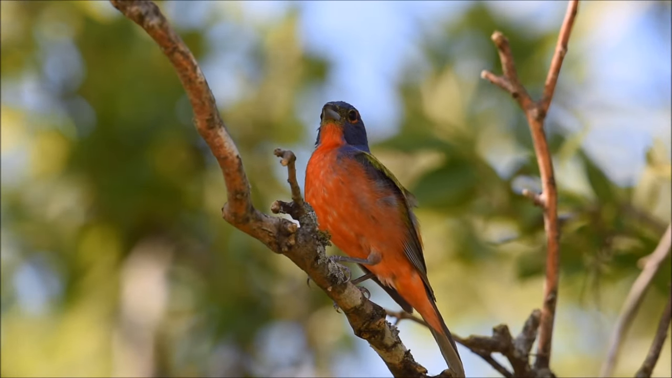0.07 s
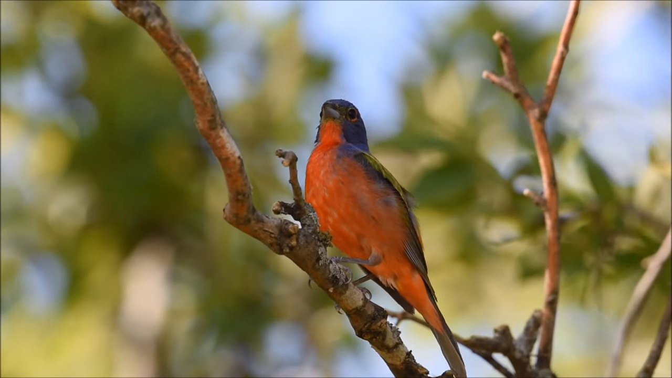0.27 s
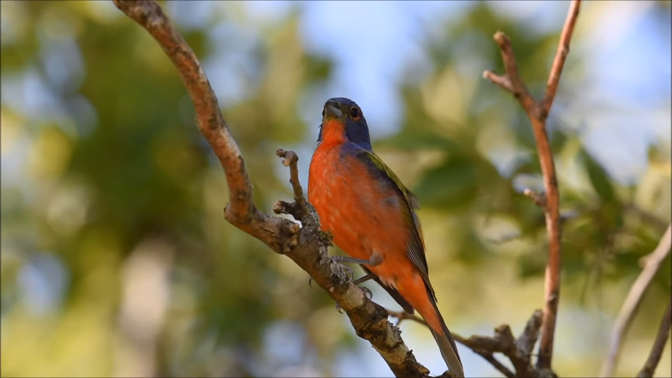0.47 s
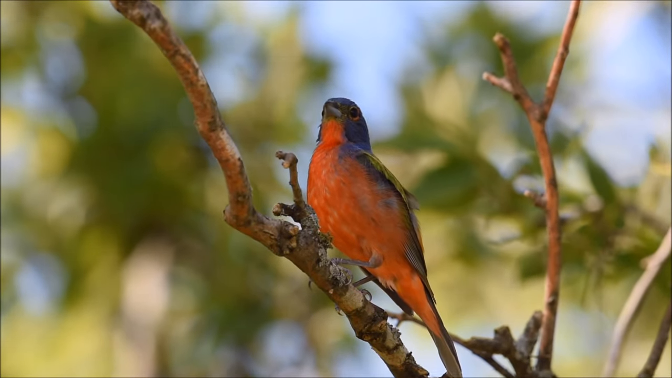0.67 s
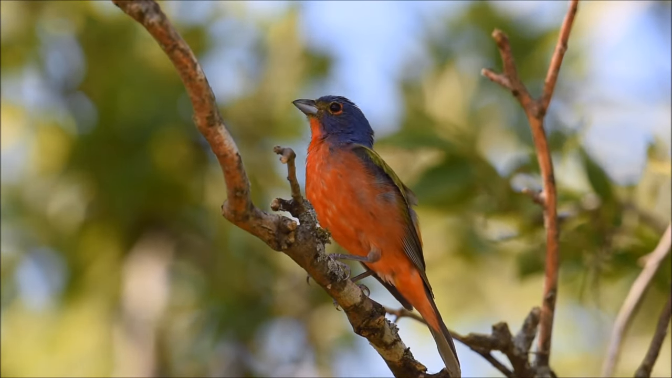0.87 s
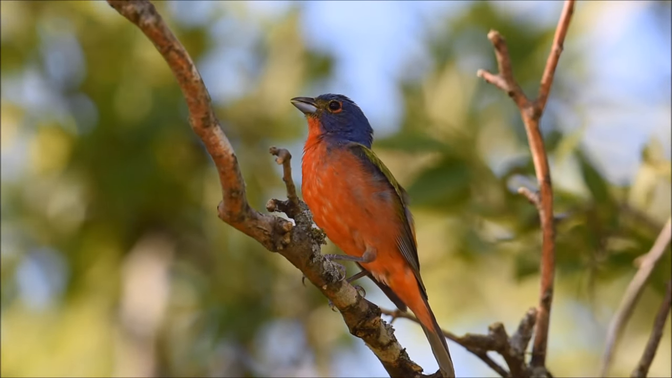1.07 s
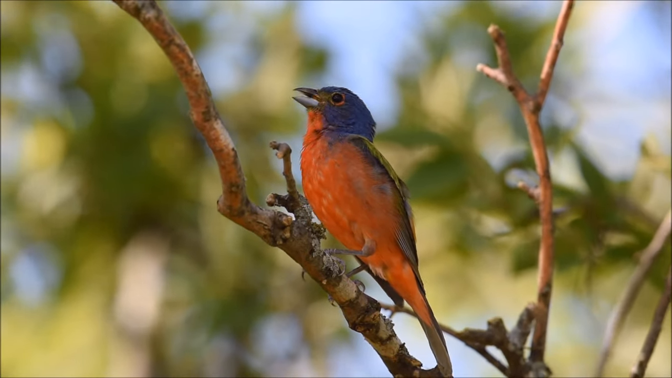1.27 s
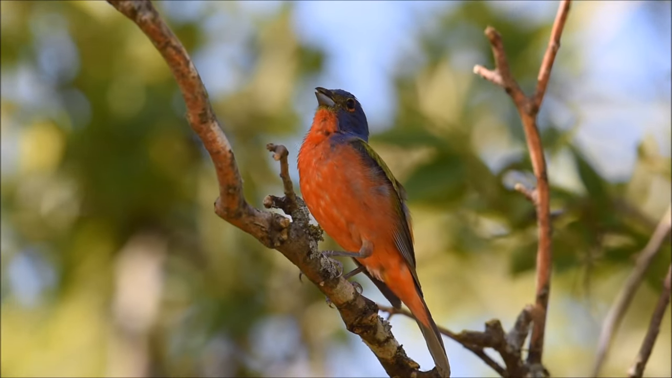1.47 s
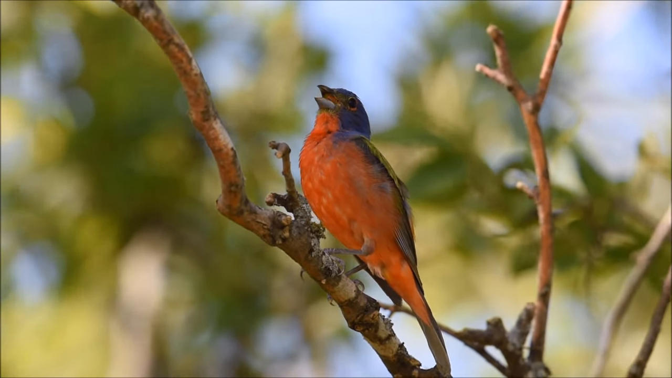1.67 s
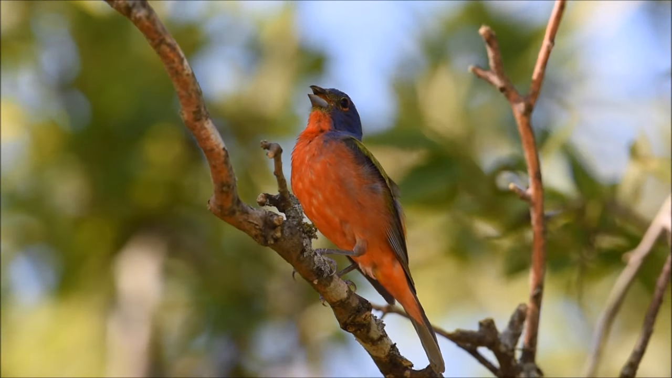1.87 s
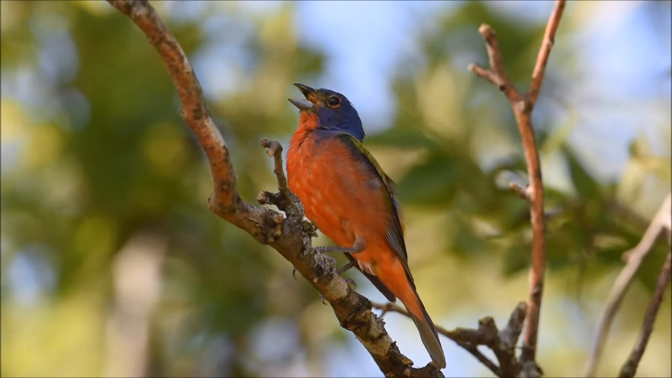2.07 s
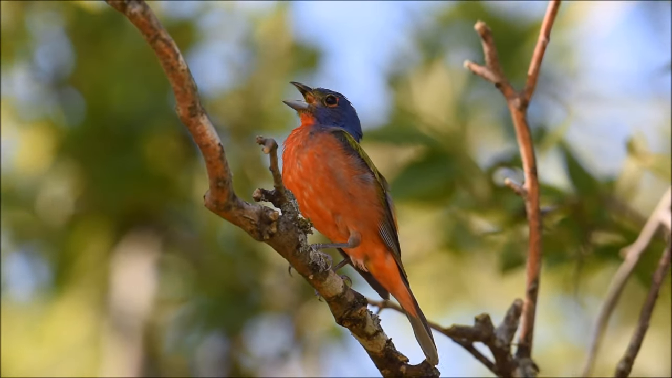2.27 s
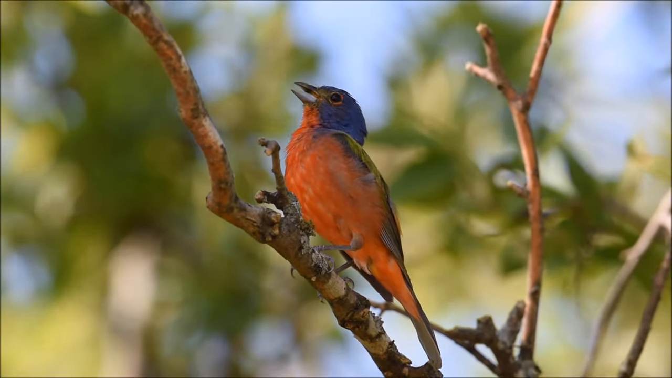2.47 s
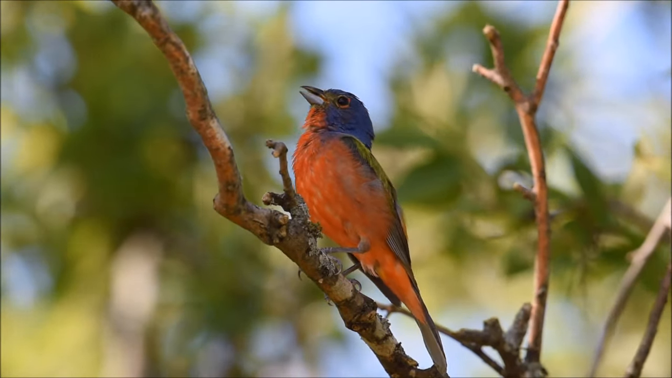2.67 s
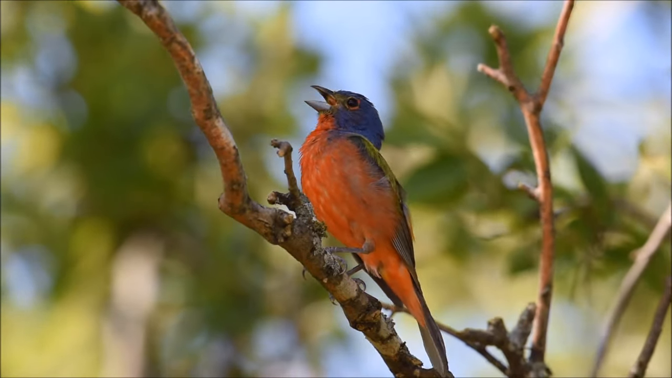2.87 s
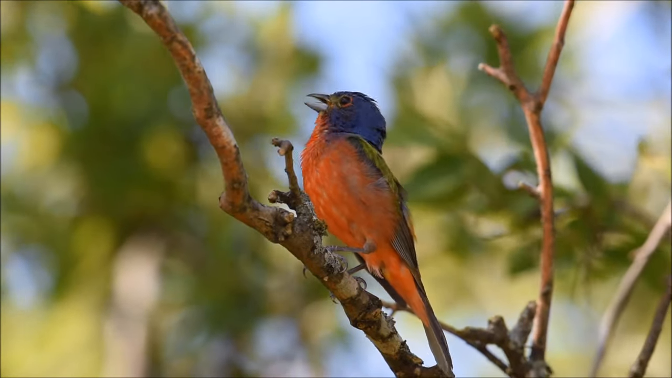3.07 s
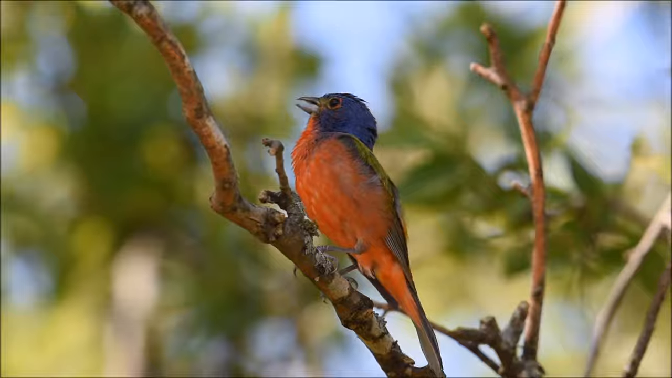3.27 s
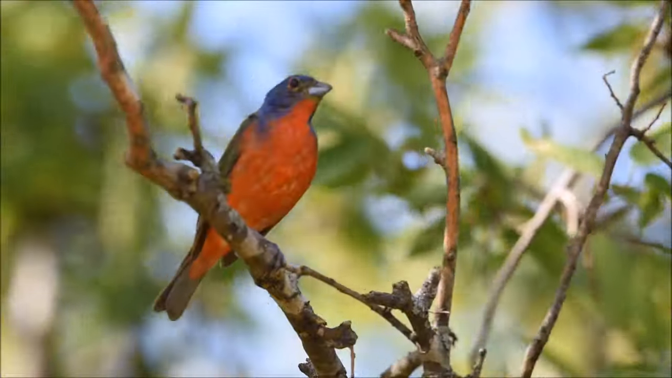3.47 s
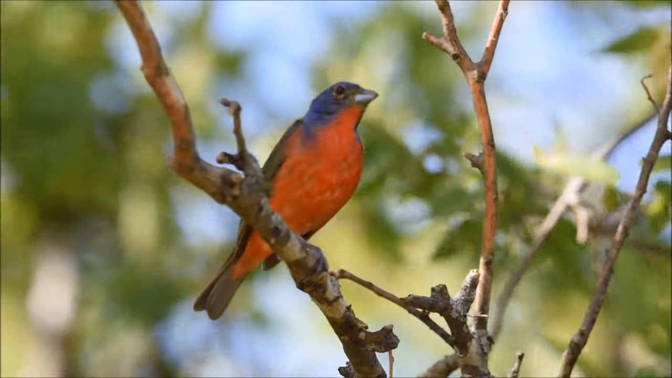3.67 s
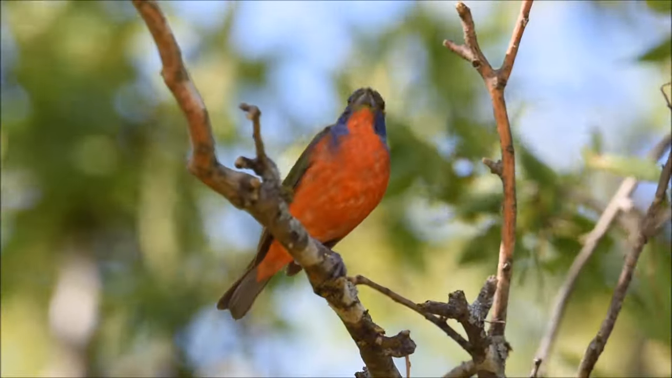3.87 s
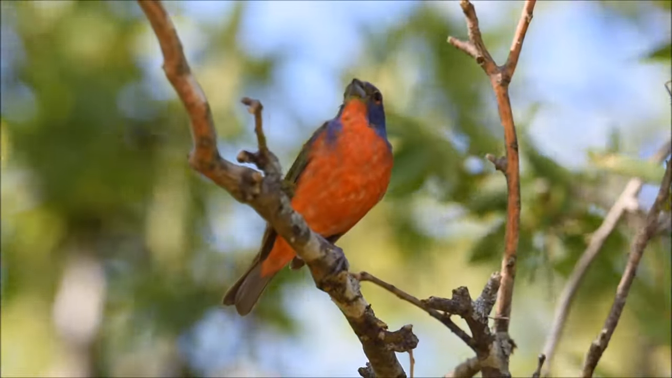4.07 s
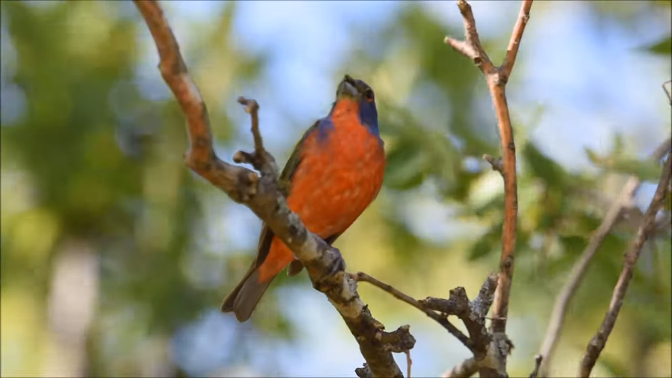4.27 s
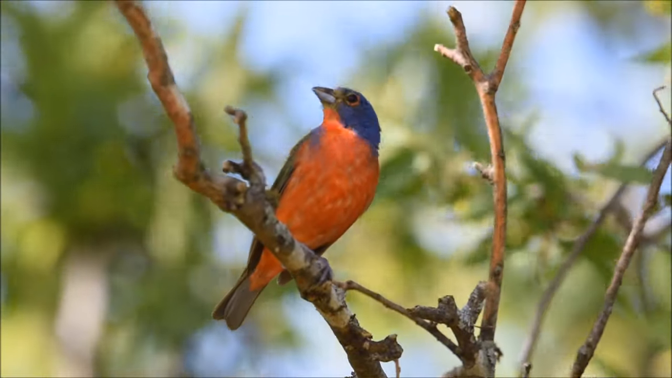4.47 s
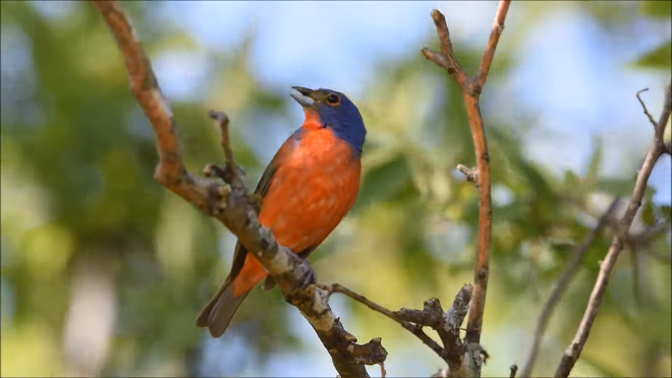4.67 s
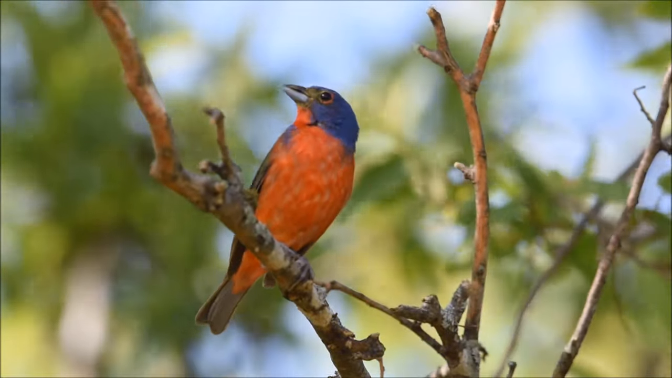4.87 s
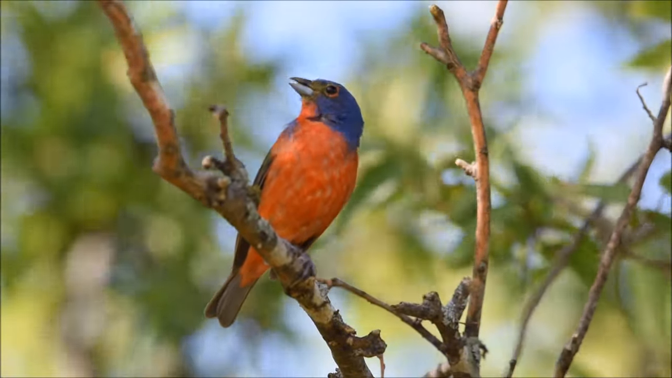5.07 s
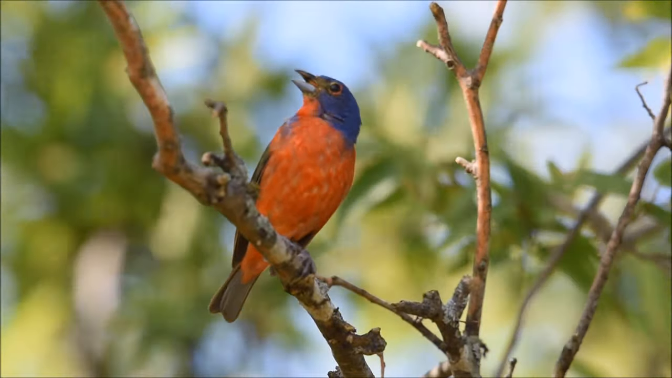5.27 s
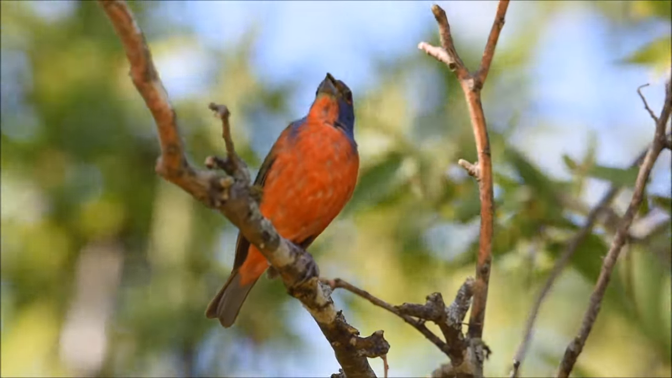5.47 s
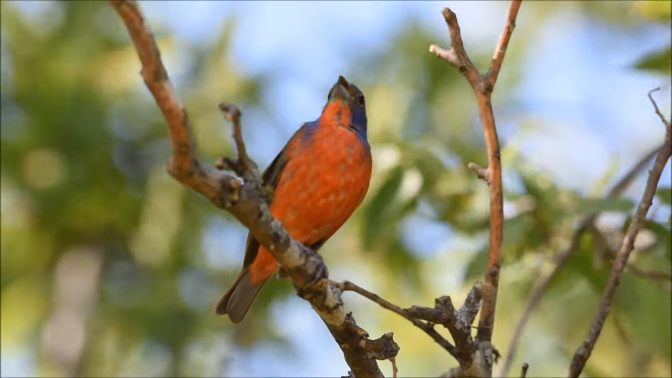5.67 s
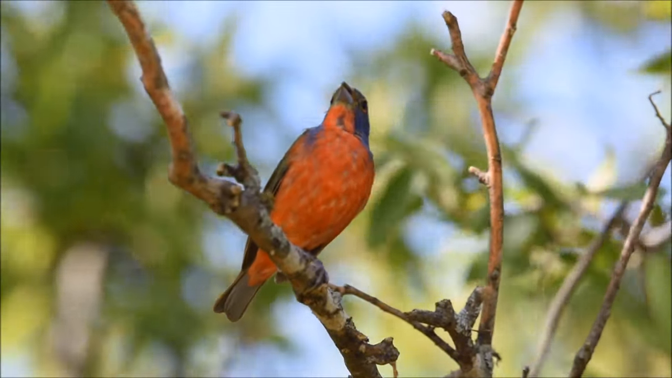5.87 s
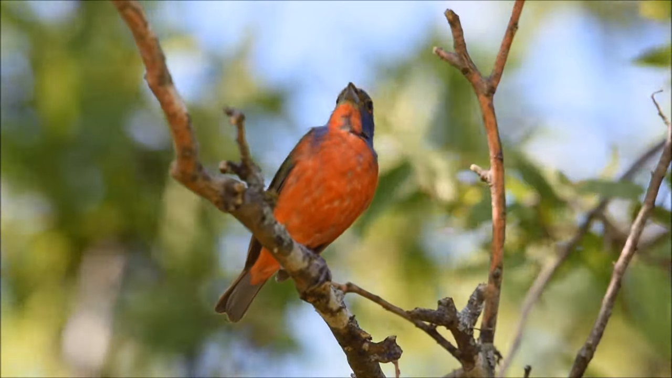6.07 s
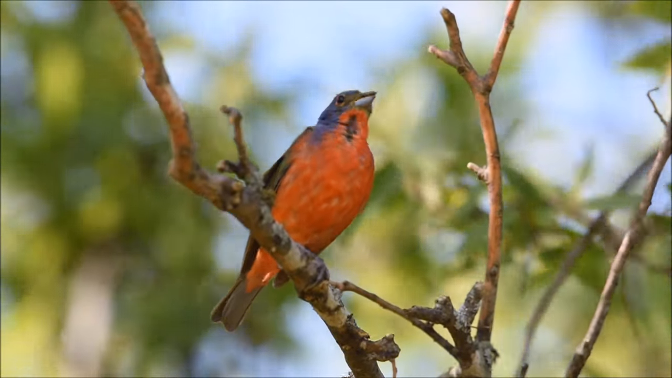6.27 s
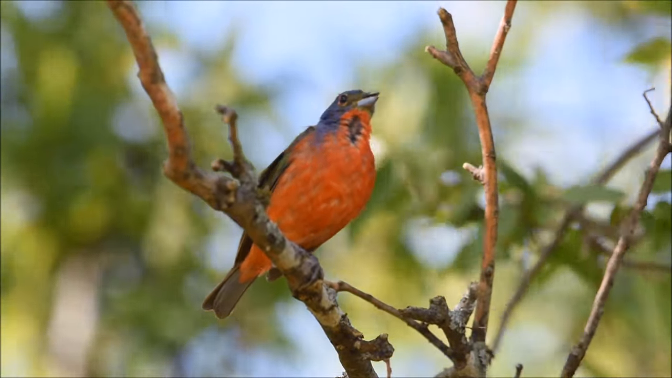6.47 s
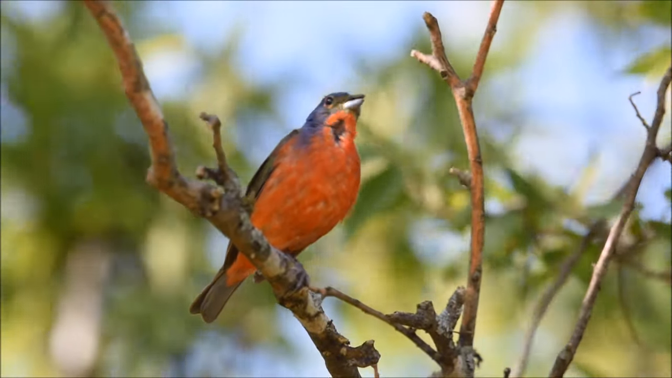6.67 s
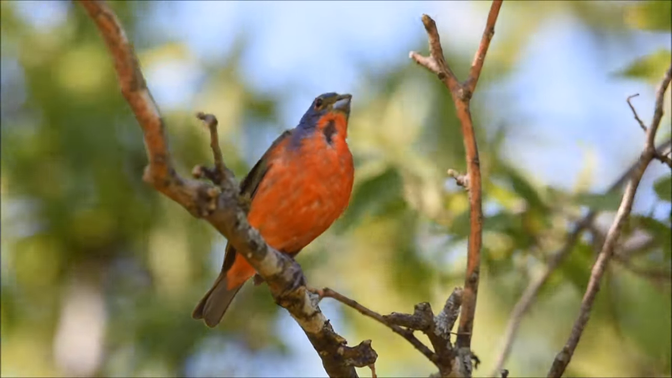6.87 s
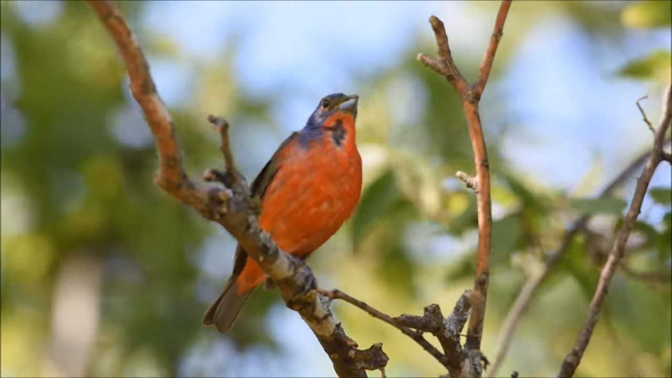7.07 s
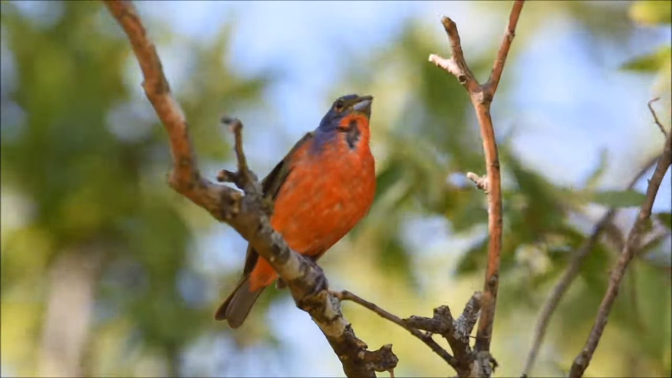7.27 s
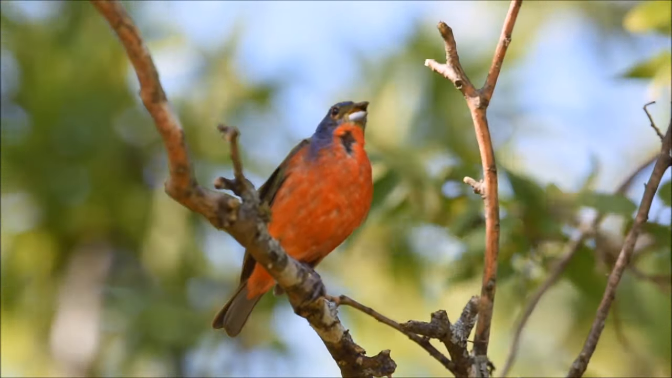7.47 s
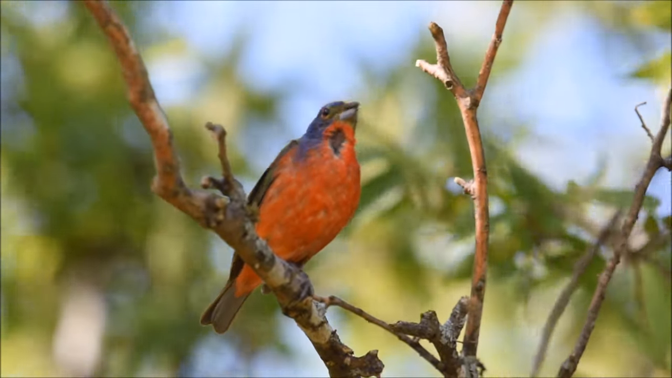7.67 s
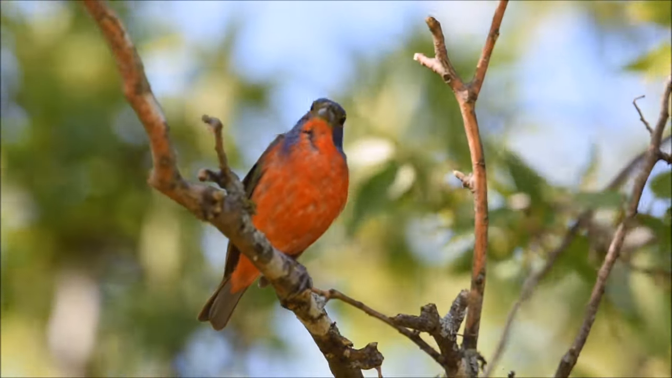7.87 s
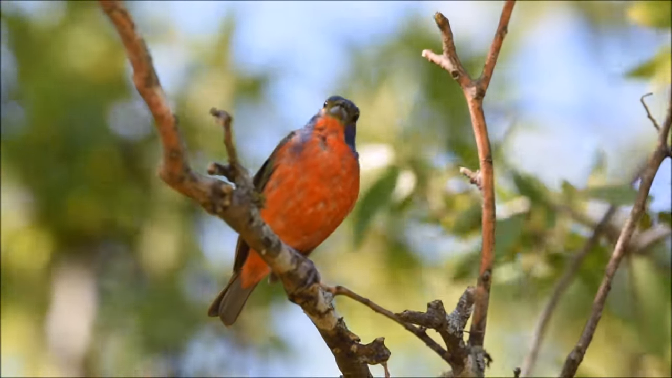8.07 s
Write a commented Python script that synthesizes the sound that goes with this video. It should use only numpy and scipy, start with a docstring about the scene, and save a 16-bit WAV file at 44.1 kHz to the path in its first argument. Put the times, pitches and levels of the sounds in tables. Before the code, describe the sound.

A small songbird whistles two quick bursts of high, gliding warble outdoors, over a faint steady machinery hum, with small twig ticks.

```python
"""Far machinery hums in a few narrow bands over a soft outdoor wash; a low rumble swells and passes.
A small finch-like songbird on a twig then warbles two phrases of gliding near-sine notes, with an echo
off the ground and the leaves. Twigs tick and leaves rustle as short noise bursts, the microphone hisses,
electronics whine thinly. The sound drops out for a moment and returns slightly louder."""
import sys
import numpy as np
from scipy import signal
from scipy.fft import rfft, irfft
from scipy.io import wavfile
from scipy.ndimage import uniform_filter1d

SR = 44100
rng = np.random.default_rng(int(sys.argv[2]) if len(sys.argv) > 2 else 0)


def generate_wav(signal):
    """Clip the signal to [-1, 1] and save it as 16-bit WAV at the path in sys.argv[1]."""
    frames = np.transpose(np.atleast_2d(signal))
    scaled = np.clip(frames, -1, 1) * 32767
    pcm = np.round(scaled).astype(np.int16)
    wavfile.write(sys.argv[1], SR, pcm)


def boost_factor(decibels):
    """Convert a level in decibels to a linear amplitude factor."""
    exponent = np.asarray(decibels, float) / 20
    return 10 ** exponent


N = 357651
T = np.arange(N) / SR  # seconds


def unit(x):
    """Scale to rms 1."""
    return x / np.sqrt(np.mean(x ** 2, axis=-1, keepdims=True))


def walk(rate):
    """Smooth random drift with about rate turns a second, rms 1."""
    k = int(SR / rate)
    steps = np.repeat(rng.standard_normal(N // k + 1), k)
    return unit(uniform_filter1d(uniform_filter1d(steps, k), k)[:N])


def band(x, hz, width_hz):
    """Four-pole band-pass, its edges held inside a safe range."""
    edges = [max(hz - width_hz / 2, hz / 8), min(hz + width_hz / 2, SR / 2.2)]
    return signal.sosfilt(signal.butter(2, edges, "bandpass", fs=SR, output="sos"), x)


def pair(apart):
    """Noise for left and right; apart 0 = the same on both sides, 1 = unrelated."""
    mid, side = rng.standard_normal((2, N))
    return (mid + apart * side * np.array([[1], [-1]])) / np.sqrt(1 + apart ** 2)


# Broad outdoor wash. Each row: frequency in Hz, density in dB per Hz.
WASH = [(20, -79), (50, -86), (150, -84.5), (380, -87.5), (550, -86), (900, -94), (1700, -96.5)]
# Microphone hiss that carries on above the wash. Each row: frequency in Hz, density in dB per Hz.
MIC_HISS = [(3000, -99), (6000, -101.5), (10000, -104), (15800, -106)]


def air():
    """Coloured noise for wash and hiss, nearer alike on both sides in the bass, unrelated in the treble."""
    hz, db = np.transpose(WASH + MIC_HISS)
    f = np.maximum(np.fft.rfftfreq(N, 1 / SR), 1)
    mid, side = rfft(rng.standard_normal((2, N)))
    apart = np.minimum(.33 + f / 7000, 1)
    colour = boost_factor(np.interp(np.log(f), np.log(hz), db)) * np.sqrt(SR / 2 / (1 + apart ** 2))
    sides = mid + apart * side * np.array([[1], [-1]])
    return irfft(colour * sides, N) * boost_factor(0.76 * walk(6))


# Resonant bands of the far machinery. Each row: centre in Hz, width in Hz, mean level in dB.
HUM_BANDS = [(131, 53, -65.5), (267.4, 54, -67.5), (310, 40, -69.5), (440.9, 26, -55.5), (591.2, 64.5, -56),
             (660, 58, -59), (738.6, 51, -59.5), (930, 30, -71.5), (1020.6, 32, -68), (1213, 82, -74.5),
             (1950, 117, -71), (2192, 90, -71.5), (3650, 130, -75), (4290, 80, -75.5)]
# Bands that lean to the right. The row: from in Hz, to in Hz, right over left in dB.
RIGHT_LEAN = (550, 800, 2.2)


def hum():
    """Far machinery: noise ringing in fixed bands that swell together and waver alone."""
    swell_db = 1.1 * walk(8)
    from_hz, to_hz, lean_db = RIGHT_LEAN
    out = np.zeros((2, N))
    for hz, width_hz, db in HUM_BANDS:
        ringing = unit(band(pair(min(0.088 + hz / 5000, 1)), hz, width_hz))
        lean = boost_factor(lean_db * (from_hz < hz < to_hz) * np.array([[-.5], [.5]]))
        out += lean * boost_factor(db + swell_db + 1.4 * walk(9)) * ringing
    return out


# Rise and fall of the rumble. Each row: time in seconds, level in dB before a small random waver.
RUMBLE_LEVEL = [(0, -63), (1.4, -63.5), (2.1, -57), (2.6, -52.5), (2.95, -51), (3.15, -67), (5.6, -82.5),
                (7.5, -70.5), (8.11, -69)]


def rumble():
    """A distant engine: one low noise band that swells and fades, almost in the middle."""
    level_db = np.interp(T, *np.transpose(RUMBLE_LEVEL)) + 1.4 * walk(6.98)
    return boost_factor(level_db) * unit(band(pair(0.12), 112.5, 67))


# Dry twig ticks. Each row: peak in seconds, level in dB.
TWIG_TICKS = [(1.228, -54), (1.351, -51), (1.375, -49), (2.332, -53), (2.634, -52), (2.68, -56), (2.7, -57),
              (4.335, -56), (4.657, -56), (6.47, -53), (7.195, -56)]
# Shape of every tick. The row: centre in Hz, nominal width in octaves, rise in s, decay t60 in s.
TWIG_SHAPE = (9000, 2.1, .001, .008)
# Rustles and knocks. Each row: peak in seconds, level in dB, centre in Hz, nominal width in octaves,
# rise in s, decay t60 in s.
LEAF_RUSTLES = [(1.855, -57, 7000, 1.8, .1, .04), (1.868, -45.5, 8000, 2.2, .006, .03),
                (3.468, -39, 1500, 1.8, .003, .025), (3.65, -52.5, 1500, 2.2, .04, .2),
                (3.866, -50, 6000, 3.1, .006, .04), (3.935, -50, 800, 1.2, .03, .1),
                (7.95, -51, 650, .8, .05, .1), (8.072, -40, 280, 2.1, .003, .13)]


def ticks():
    """Twigs, rustles and knocks: crackly noise bursts with a ramped rise and an exponential fall."""
    out = np.zeros((2, N))
    crackle = pair(.7) * boost_factor(3.5 * walk(700))
    for peak, db, hz, octaves, rise, t60 in [tick + TWIG_SHAPE for tick in TWIG_TICKS] + LEAF_RUSTLES:
        a = int((peak - rise) * SR)
        t = T[a:a + SR // 3] - peak
        attack = np.sqrt(np.maximum(1 + t / rise, 0))
        decay = np.exp(-np.log(1000) * np.maximum(t, 0) / t60)
        width_hz = hz * (2 ** (octaves / 2) - 2 ** (-octaves / 2))
        noise = unit(band(crackle[:, a:a + len(t)], hz, width_hz))
        out[:, a:a + len(t)] += boost_factor(db) * np.where(t < 0, attack, decay) * noise
    return out


# Trills and brief catches laid on a note. Each row: first flick in seconds, last flick in seconds,
# period in s, pitch swing in Hz (before the voice rounds it), build-up and die-away time constants in s,
# swell in dB.
PITCH_FLICKS = [(1.576, 1.604, .028, 200, .002, .002, -18), (3.072, 3.169, .0323, -620, .003, .02, -6),
                (4.898, 4.96, .0305, 950, .009, .003, 10), (5.451, 5.514, .031, 900, .01, .004, 12),
                (5.644, 5.725, .0268, -850, .005, .005, -3), (7.365, 7.42, .027, -500, .005, .005, -1.5)]


def trills():
    """Pitch swing (Hz) and swell (dB): each flick builds up, peaks and dies away exponentially."""
    swing, swell = np.zeros((2, N))
    for first, last, period, hz, lead, trail, db in PITCH_FLICKS:
        near = slice(int((first - .1) * SR), int((last + .1) * SR))
        t = T[near]
        count = round((last - first) / period) + 1
        for peak in first + period * np.arange(count):
            flick = np.exp(-np.where(t < peak, (peak - t) / lead, (t - peak) / trail))
            swing[near] += hz * flick
            swell[near] += db * flick
    return swing, swell


# Plain straight whistles. Each row: start in seconds, length in s, from in Hz, to in Hz,
# level in dB ahead of the voice and the final mix.
WHISTLES = [(1.014, .062, 3750, 3930, -54), (1.21, .034, 4450, 4230, -49), (1.558, .054, 3500, 3420, -42),
            (1.72, .043, 4120, 4340, -43), (1.768, .036, 4330, 4520, -43), (2.602, .022, 4480, 4300, -47),
            (3.0, .009, 4600, 4450, -37), (3.729, .041, 4390, 4340, -58), (4.14, .055, 3270, 3230, -45),
            (4.305, .088, 4090, 4440, -43.5), (5.285, .04, 4640, 5080, -41.5),
            (6.15, .022, 2900, 2300, -55), (7.002, .012, 4900, 5600, -46), (8.035, .06, 2400, 2950, -61)]
# Effort along a whistle. Each row: share of its length, level in dB.
WHISTLE_SWELL = [(0, -14), (.25, -3), (.5, 0), (1, -10)]
# The bird's stock of gestures by name. Each row: seconds from start, pitch in Hz, effort in dB,
# all as sung without variation.
GESTURES = { "slide": [(0, 4350, -18), (.008, 4480, -10), (.035, 4060, 0), (.07, 3830, -6),
            (.125, 3800, -23)], "hook": [(0, 3920, -23), (.017, 4350, -10), (.024, 4560, 0),
            (.034, 3480, -10), (.043, 3300, -11), (.056, 3480, -6), (.08, 4150, 0), (.096, 4220, -18)],
            "flick": [(0, 4260, -24), (.012, 4300, -10), (.03, 4480, -7), (.039, 4700, 0), (.044, 5300, -7),
            (.048, 6150, -13), (.054, 6600, -18)], "snap": [(0, 4380, -14), (.006, 4560, 0),
            (.015, 6760, -24)], "dive": [(0, 6750, -25), (.009, 6350, -15), (.028, 5740, 0),
            (.062, 4580, -8), (.068, 4600, -16)], "swoop": [(0, 6500, -21), (.007, 5500, -7),
            (.013, 4850, -2), (.023, 4620, 0), (.037, 4400, -16)], "scoop": [(0, 4600, -7),
            (.022, 5400, -5), (.038, 5420, -2), (.056, 4270, 0), (.074, 3920, -5), (.112, 4130, -7),
            (.13, 4380, -5), (.145, 4380, -14)], "zigzag": [(0, 4350, -22), (.012, 4520, 0),
            (.033, 3750, -1), (.05, 4310, 0), (.081, 3170, -9), (.104, 3800, -7), (.137, 3870, -5),
            (.148, 3900, -8)], "burr": [(0, 3140, 0), (.027, 2820, -4), (.062, 2750, -2), (.097, 2800, -4),
            (.125, 3200, -6)], "arch": [(0, 2710, -11), (.024, 3750, -4), (.037, 3960, 0), (.056, 3560, -3),
            (.092, 3230, -8)], "blip": [(0, 2890, -9), (.009, 4150, -1), (.024, 3300, 0), (.035, 2950, -8)],
            "squeak": [(0, 6400, -22), (.006, 5660, 0), (.015, 5810, -6), (.032, 6850, -8),
            (.036, 8870, -28), (.06, 7500, -11), (.085, 7050, -24)], "dip": [(0, 4350, -17),
            (.011, 4440, -5), (.031, 2930, -2), (.044, 3620, -2), (.061, 3980, 0), (.108, 3370, -10)],
            "ladle": [(0, 3300, -14), (.01, 4290, -8), (.027, 3630, -2), (.047, 3100, -6),
            (.064, 3060, -19), (.092, 3400, -8), (.111, 4080, 0), (.135, 4090, 0), (.156, 4010, -10)],
            "rattle": [(0, 3450, -20), (.024, 3780, 0), (.1, 3800, -2), (.155, 3620, -8),
            (.172, 3500, -20)], "check": [(0, 4250, -1), (.022, 3150, -3), (.038, 3620, -3),
            (.066, 3620, -10)], "tumble": [(0, 5220, -21), (.014, 4920, -4), (.029, 5530, -2),
            (.038, 4750, 0), (.054, 4550, 0), (.086, 4550, 0), (.136, 4500, -15)], "tent": [(0, 3700, -22),
            (.016, 3930, -7), (.03, 3070, -6), (.082, 4900, -2), (.099, 5210, -3), (.131, 3590, 0),
            (.142, 3450, -10)], "jig": [(0, 4100, -22), (.011, 5400, -20), (.021, 4250, -15),
            (.03, 3970, 0), (.037, 3340, -13), (.047, 4340, -12), (.059, 4310, -5), (.082, 3000, -18),
            (.104, 4020, -21)], "stutter": [(0, 2990, -6), (.026, 3200, -2), (.033, 3480, 0),
            (.042, 2940, -14), (.047, 2400, -22), (.059, 2400, -21), (.066, 3290, -2), (.079, 3060, -20)],
            "vault": [(0, 5700, 0), (.005, 6700, -3), (.021, 7500, -15), (.028, 7150, 0), (.056, 6450, -5)],
            "drop": [(0, 5500, -6), (.007, 5400, 0), (.018, 4500, -2), (.025, 3900, -8)],
            "kink": [(0, 5400, -5), (.019, 5850, -3), (.032, 5120, 0), (.049, 5150, -9)],
            "step": [(0, 3650, -18), (.013, 3650, -4), (.028, 3620, 0), (.036, 3190, -1), (.044, 4200, -11),
            (.055, 4610, 0), (.107, 4010, 0), (.123, 4100, -16)], "ripple": [(0, 4050, -18),
            (.011, 4350, -8), (.022, 4230, 0), (.035, 3800, -11), (.113, 3695, -9), (.131, 3700, -24)],
            "hill": [(0, 3620, -24), (.025, 3700, 0), (.067, 4780, -3), (.106, 4130, -2), (.116, 4130, -5)],
            }
# Syllables in order. Each row: gesture name, start in seconds, level in dB ahead of the voice and the mix;
# a varied repeat adds stretch of length (factor), shift in semitones, stretch of pitch swing (factor).
SUNG = [("slide", 1.335, -40.5), ("hook", 1.861, -34, .9, 0, 1.05), ("hook", 2.014, -31),
        ("hook", 2.168, -29), ("squeak", 2.325, -38), ("dip", 2.444, -35), ("snap", 2.621, -33),
        ("dive", 2.636, -29), ("ladle", 2.741, -31.5), ("drop", 2.961, -33),
        ("drop", 2.982, -35, .8, 2.4, 1.05), ("rattle", 3.039, -33),
        ("flick", 3.254, -30.5, 1.14, -.7, 1.12), ("swoop", 3.317, -32.5, .9, .4, 1.42),
        ("slide", 3.871, -52, .65, .4, .95), ("check", 4.479, -48.5), ("scoop", 4.653, -45, .9, .1, 1.12),
        ("burr", 4.878, -55), ("zigzag", 5.061, -44.5), ("snap", 5.317, -47, .9, 2.2, .72),
        ("dive", 5.331, -41, .65, 0, .97), ("burr", 5.438, -51.5, .95, -1, .8), ("tumble", 5.604, -35.5),
        ("tent", 5.775, -33.5), ("flick", 5.998, -32.5, 1.05, .3, .9), ("swoop", 6.057, -36, 1.2, 0, 1.25),
        ("blip", 6.137, -48, .55, -.2, .4), ("arch", 6.184, -39), ("jig", 6.276, -35.5),
        ("zigzag", 6.463, -40.5, .83, 1, 1.03), ("stutter", 6.645, -42),
        ("scoop", 6.775, -42, 1.03, -1.4, .97), ("vault", 7.009, -53), ("kink", 7.042, -52),
        ("step", 7.138, -39), ("ripple", 7.327, -37), ("flick", 7.508, -43, 1.03, 2.9, .6),
        ("swoop", 7.559, -44, .9, -1.2, .85), ("blip", 7.668, -43.5), ("hill", 7.733, -43),
        ("blip", 7.959, -49.5, 1.45, .5, .6)]


def notes():
    """Each note as times, pitches and levels: straight whistles, then syllables stretched and shifted."""
    share, swell_db = np.transpose(WHISTLE_SWELL)
    for start, length, from_hz, to_hz, db in WHISTLES:
        yield start + length * share, from_hz + (to_hz - from_hz) * share, db + swell_db
    for name, start, db, *varied in SUNG:
        stretch, semitones, swing = varied or (1, 0, 1)
        at, hz, effort_db = np.transpose(GESTURES[name])
        pitch = 2 ** (semitones / 12) * hz[0] * (hz / hz[0]) ** swing
        yield start + stretch * at, pitch, db + effort_db


# Overtones of the voice. Each row: multiple of the pitch, level in dB before the throat shapes it.
VOICE_OVERTONES = [(2, -26), (3, -37)]
# How overtones leave the beak. Each row: overtone frequency in Hz, gain in dB.
BEAK_GAIN = [(5700, -3), (6800, -22), (10300, -13), (12000, -17), (14000, 0)]
# Raspiness. The row: pitch in Hz above which the voice wobbles, rms wobble in Hz per Hz of excess.
VOICE_RASP = (5400, .07)


def bird():
    """Near-sine notes glide with rounded turns, flutter, rasp when high and carry faint overtones."""
    out = np.zeros(N)
    flutter = boost_factor(2.7 * walk(240))
    swing, swell = trills()
    rasp = walk(600)
    rasp_from_hz, rasp_depth = VOICE_RASP
    beak_hz, beak_db = np.transpose(BEAK_GAIN)
    pad = SR // 100
    for at, hz, db in notes():
        a, b = int(at[0] * SR) - pad, min(int(at[-1] * SR) + pad, N)
        t = T[a:b]
        pitch = uniform_filter1d(np.interp(t, at, hz) + swing[a:b], int(.003 * SR))
        pitch = pitch + rasp_depth * np.maximum(pitch - rasp_from_hz, 0) * rasp[a:b]
        # the airflow opens and shuts within a few milliseconds
        opening, closing = (t - at[0]) / .007 + .6, (at[-1] - t) / .007 + .6
        airflow = np.clip(np.minimum(opening, closing), 0, 1) ** 2
        phase = 2 * np.pi * np.cumsum(pitch) / SR
        tone = np.sin(phase)
        for k, overtone_db in VOICE_OVERTONES:
            gain = boost_factor(overtone_db + np.interp(k * pitch, beak_hz, beak_db) + 4 * rasp[a:b])
            tone = tone + gain * np.sin(k * phase) * (k * pitch < SR / 2.5)
        out[a:b] += np.sqrt(2) * boost_factor(np.interp(t, at, db) + swell[a:b]) * airflow * tone
    return out * flutter


# Bounce off the ground. The row: delay in seconds, level in dB against the song as sung.
GROUND_BOUNCE = (0.0081, -13)


def leaves(song, near_db=-6.5, near_t60=.1, far_db=-16, far_t60=.3, apart=.6):
    """One bounce off the ground, and close leaves and farther trees scattering two decaying tails."""
    t = T[:SR // 2]
    scatter = pair(apart)[:, :len(t)] * (1 - np.exp(-t / 0.001))
    tail = 0
    for db, t60 in ((near_db, near_t60), (far_db, far_t60)):
        fade = np.exp(-np.log(1000) * t / t60)
        tail = tail + boost_factor(db) * fade / np.sqrt(np.sum(fade ** 2))
    delay, bounce_db = GROUND_BOUNCE
    bounce = boost_factor(bounce_db) * (np.arange(len(t)) == int(delay * SR))
    return signal.fftconvolve(song[None], scatter * tail + bounce, axes=1)[:, :N]


def scene():
    """The song, lifted 2 dB, with its echo over the outdoor background."""
    song = bird()
    return air() + hum() + rumble() + ticks() + leaves(song) + boost_factor(2.0) * song


def whine():
    """A thin, slightly wavering sine from the electronics, near the top of hearing."""
    hz, db = 15622, -77  # rms level, ahead of the lift after the dropout
    return np.sqrt(2) * boost_factor(db + 1.3 * walk(3.9)) * np.sin(2 * np.pi * hz * T)


# Moment of silence. The row: start in seconds, end in seconds.
SILENCE = (3.3635, 3.4088)
# Lift once the sound returns. The row: left in dB, right in dB.
LATER_LIFT = (1.1, 2.0)


def dropout():
    """Gain over time: full level, a hard-edged silence, then slightly louder on each side."""
    start, end = SILENCE
    return np.where(T > end, boost_factor(np.array(LATER_LIFT))[:, None], T < start)


def band_limit(x):
    """A steep low-pass at the top of the band."""
    return signal.sosfilt(signal.butter(12, 16550, fs=SR, output="sos"), x)


def record(dry):
    """Adds the electronic whine, drops out for a moment and cuts the top steeply."""
    top_cut = signal.ellip(10, .2, 70, 15830, fs=SR, output="sos")  # ripple dB, stopband dB, edge Hz
    mix = signal.sosfilt(top_cut, (dry + whine()) * dropout())
    return band_limit(mix)


dry = scene()
out = record(dry)
generate_wav(out)
```